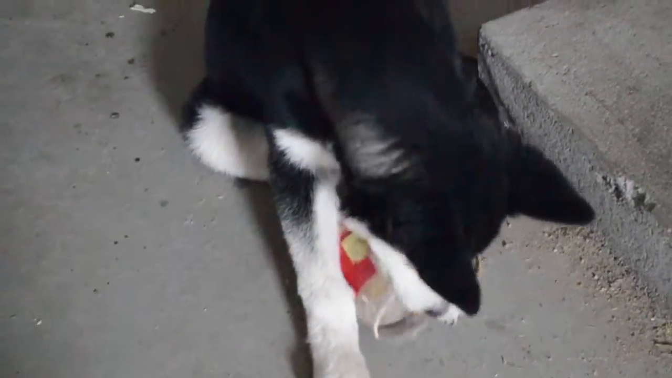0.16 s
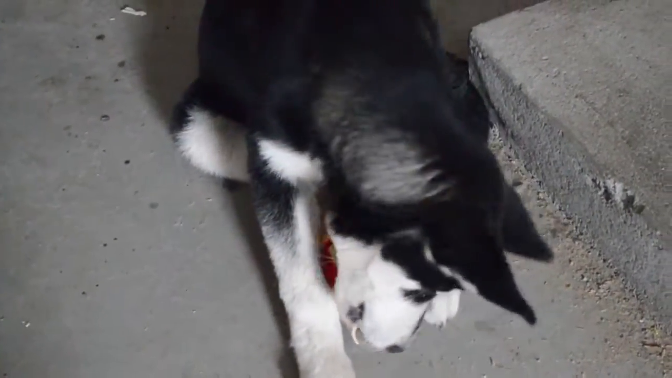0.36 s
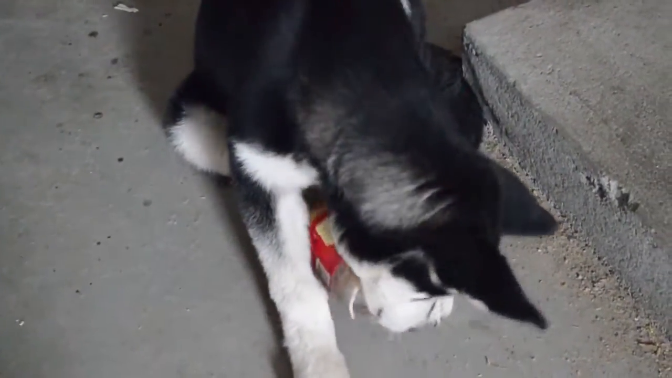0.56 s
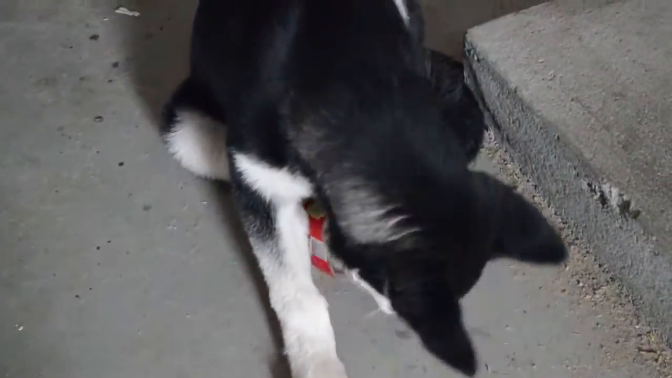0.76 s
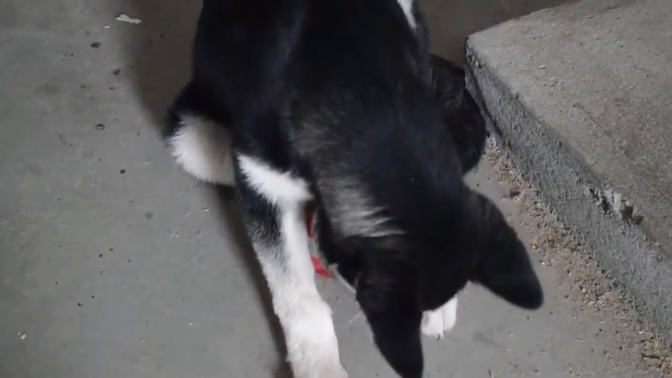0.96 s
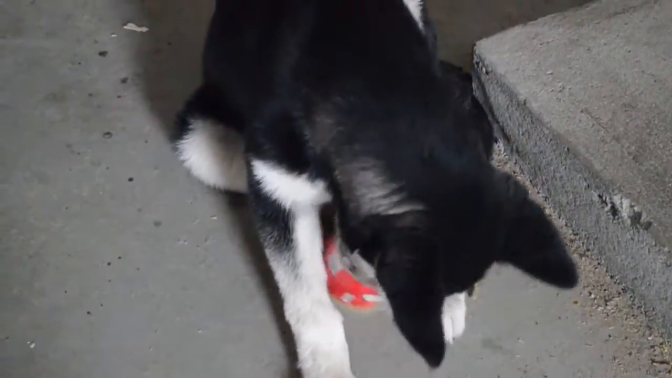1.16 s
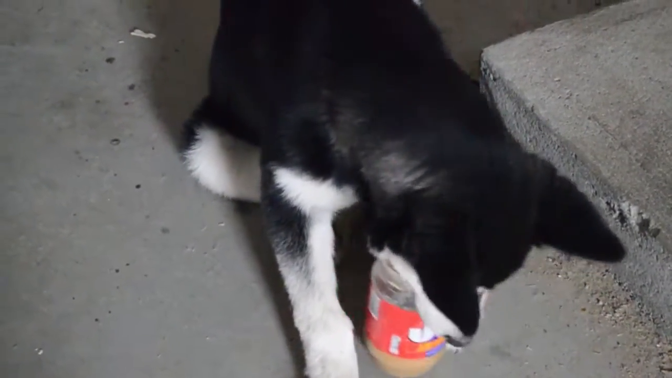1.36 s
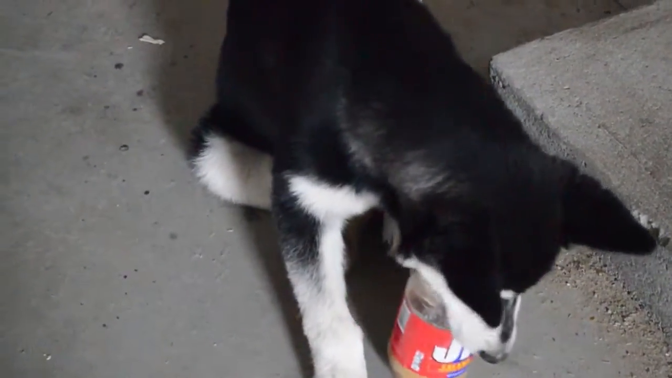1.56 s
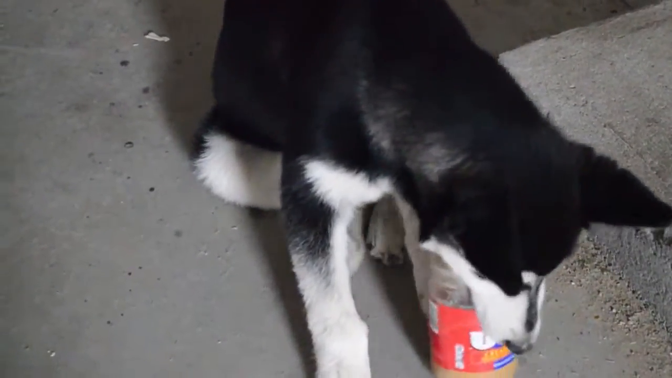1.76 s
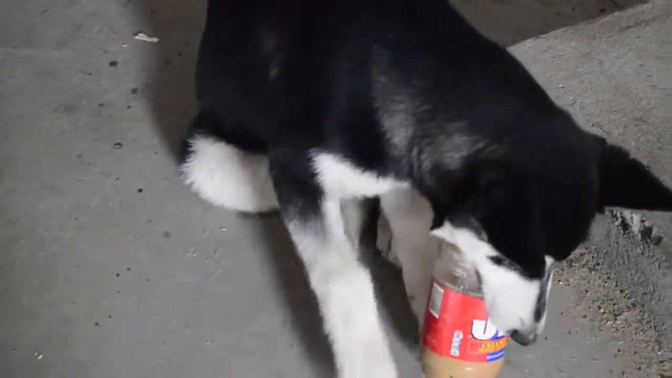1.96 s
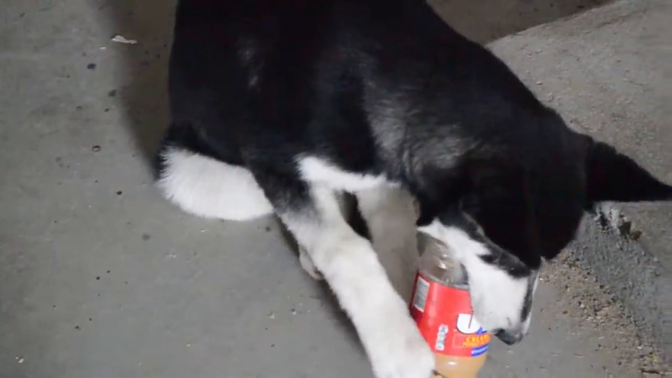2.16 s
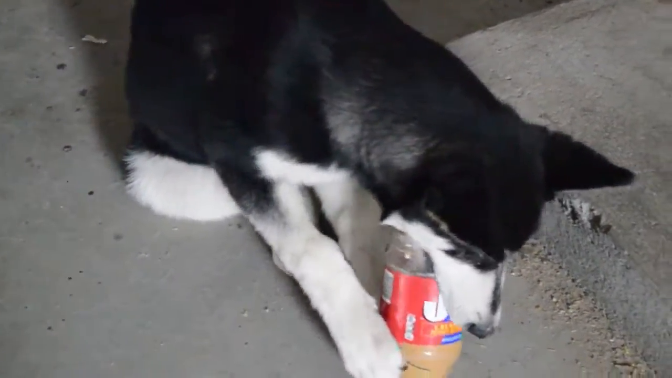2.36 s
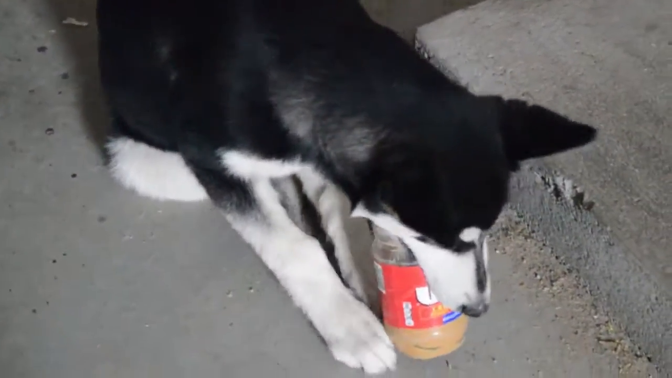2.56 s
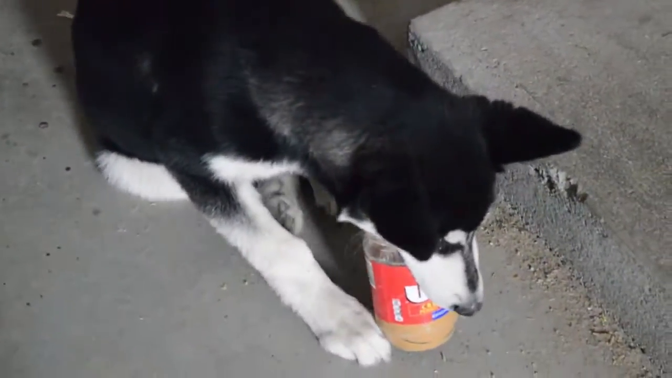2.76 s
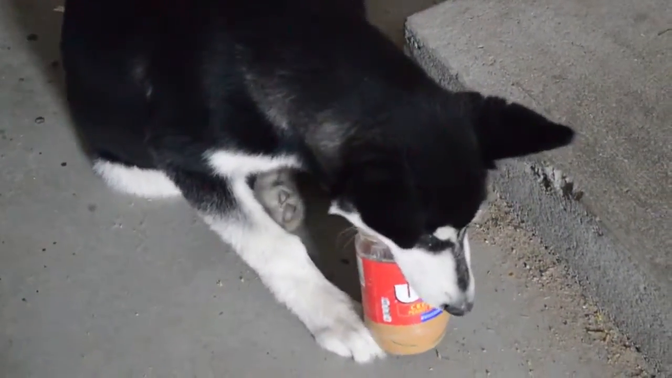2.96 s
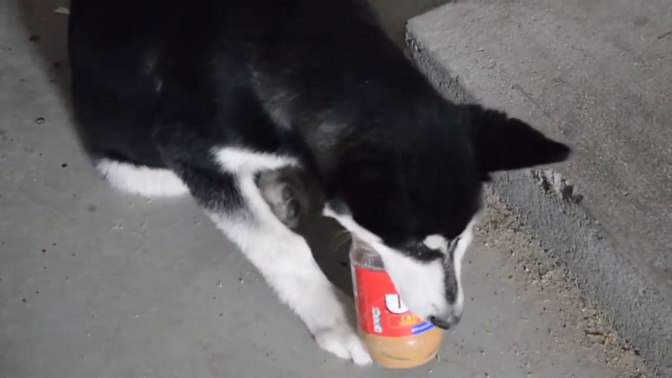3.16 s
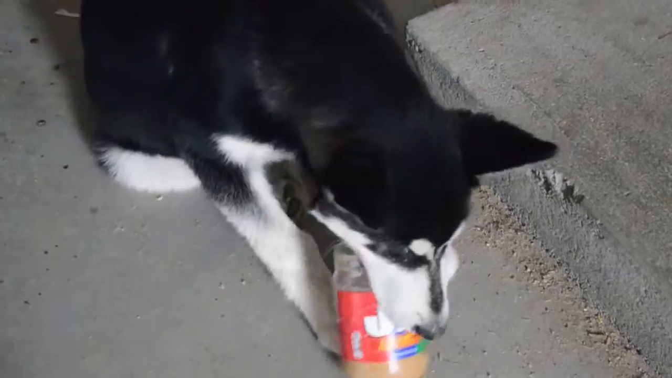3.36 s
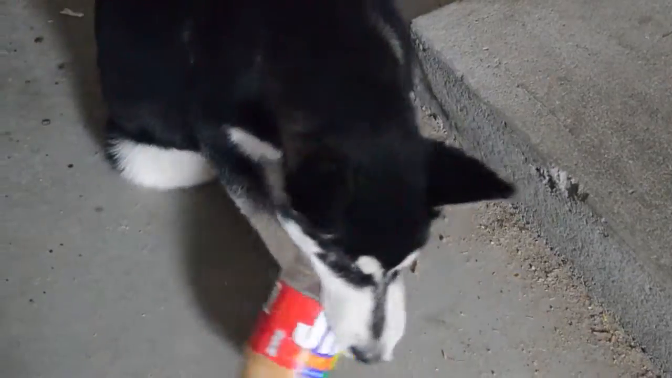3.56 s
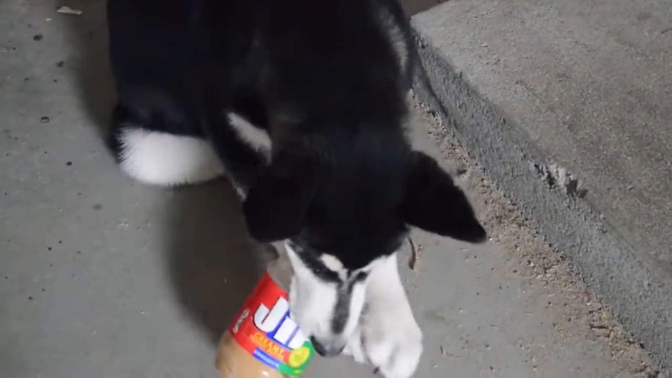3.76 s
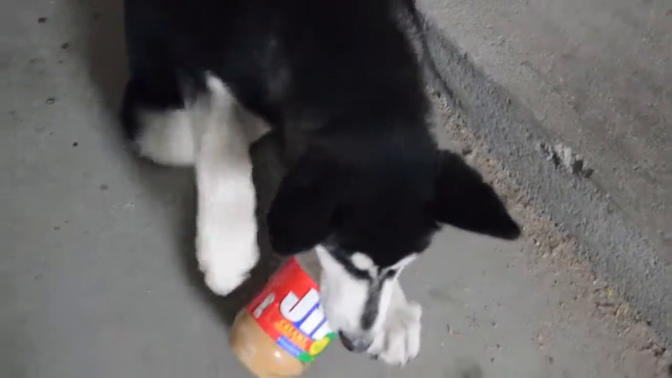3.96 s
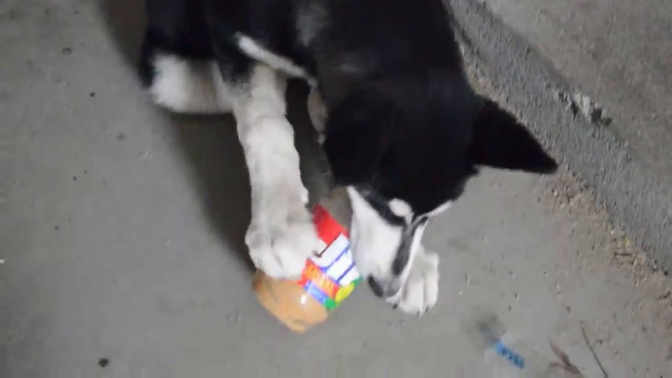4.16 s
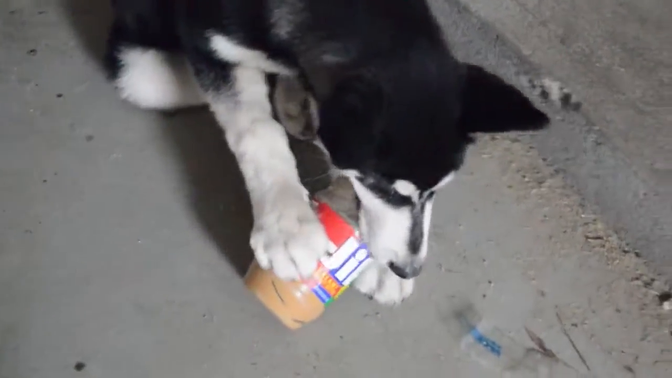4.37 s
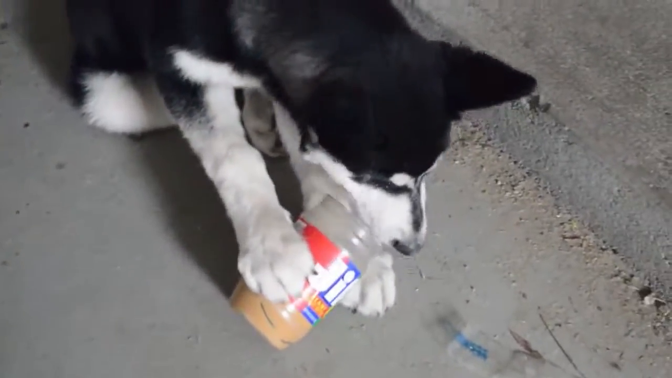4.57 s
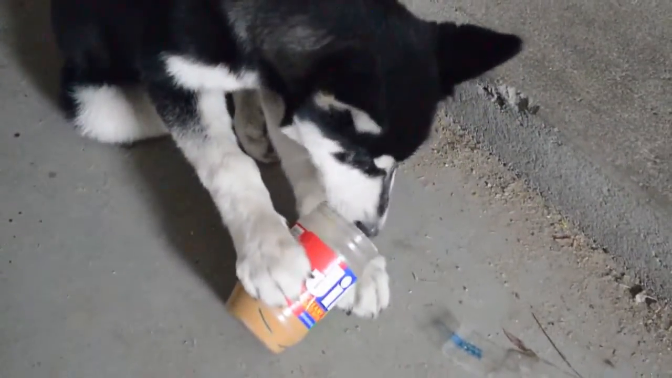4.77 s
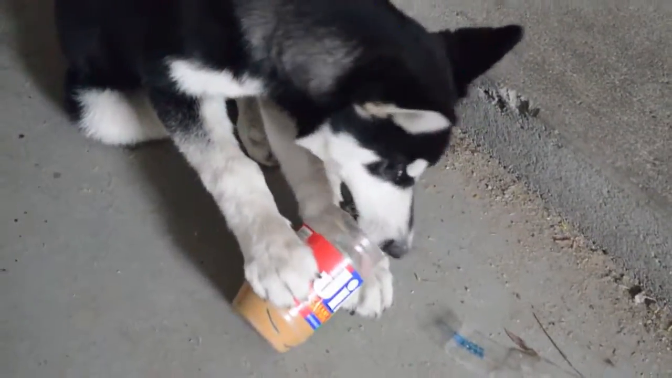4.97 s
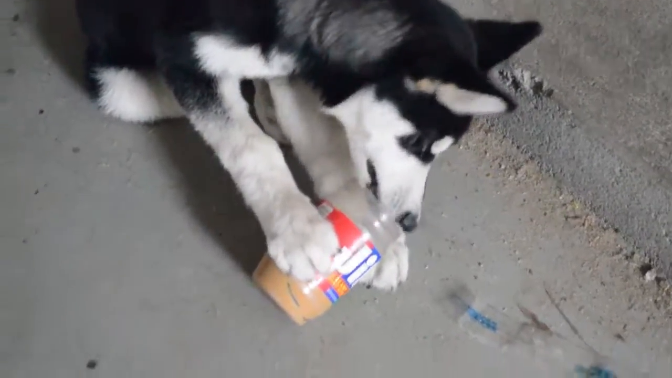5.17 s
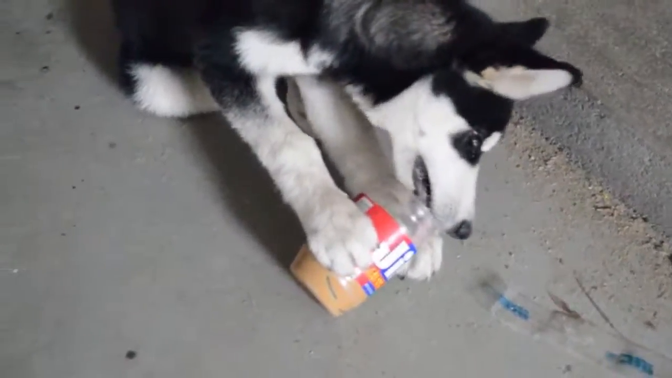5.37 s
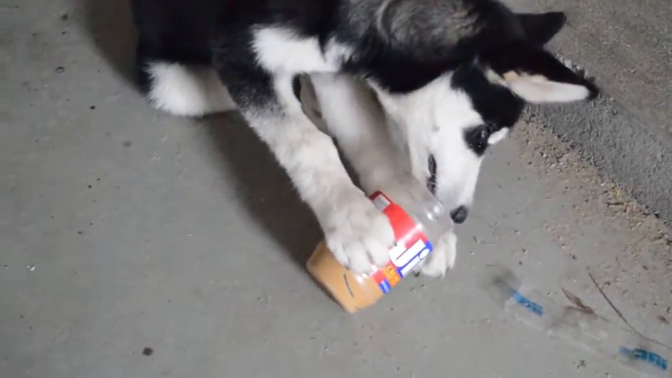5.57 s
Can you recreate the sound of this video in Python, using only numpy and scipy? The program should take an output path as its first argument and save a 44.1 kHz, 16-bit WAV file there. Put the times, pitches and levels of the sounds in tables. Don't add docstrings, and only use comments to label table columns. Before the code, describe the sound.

In a bare, echoing concrete garage a puppy works at an open plastic jar. Sharp knocks, hollow booms and gritty scrapes come in clusters, with wet tongue hiss and dry clicks between. The hardest clatter comes a little past the middle, then it calms to rasping and licking. A close, nearly mono handheld microphone also catches low room wash, a far engine and thin whine.

```python
import sys
import numpy as np
from scipy import signal
from scipy.fft import rfft, irfft, next_fast_len
from scipy.io import wavfile
from scipy.ndimage import uniform_filter1d

SR = 44100
rng = np.random.default_rng(int(sys.argv[2]) if len(sys.argv) > 2 else 0)


def unload_audio(sound):
    columns = np.transpose(np.atleast_2d(sound))
    steps = np.round(np.clip(columns, -1, 1) * 32767)
    wavfile.write(sys.argv[1], SR, steps.astype(np.int16))


def magnitude_from_level(level_db):
    exponent = np.asarray(level_db, float) / 20
    return 10 ** exponent


N = 247821


def evened(x):
    return x / np.sqrt(np.mean(x ** 2) + 1e-20)


def peaked(x):
    return x / abs(x).max()


def read(points, hz):
    f, value = np.transpose(points)
    return np.interp(np.log(hz + 1), np.log(f + 1), value)


def add(mix, s, sound):
    part = mix[round(s * SR):][:len(sound)]
    part += sound[:len(part)]


def bandpass(x, low_hz, high_hz):
    return signal.sosfilt(signal.butter(3, [low_hz, high_hz], "band", fs=SR, output="sos"), x)


def coloured(x, points):
    size = next_fast_len(len(x))
    gain = magnitude_from_level(read(points, np.fft.rfftfreq(size, 1 / SR)))
    return evened(irfft(rfft(x, size) * gain, size)[:len(x)])


def resonate(x, hz, width_hz):
    turn = np.exp(2j * np.pi * np.cumsum(hz * np.ones(len(x))) / SR)
    r = np.exp(-np.pi * width_hz / SR)
    return 2 * (turn * signal.lfilter([1 - r], [1, -r], x / turn)).real


def wobble(s):
    once = uniform_filter1d(rng.standard_normal(N), int(s * SR))
    return evened(uniform_filter1d(once, int(s * SR)))


def grit(per_s, spread_db):
    size = magnitude_from_level(spread_db * np.minimum(rng.exponential(1, N), 3))
    return evened(rng.standard_normal(N) * size * (rng.random(N) < per_s / SR))


# (frequency [Hz], level [dB per Hz])
WASH = [(12, -41), (20, -15), (59, 2.5), (342, -0.5), (382, 1.5), (549, -6.5), (857, -2), (1580, -8),
        (2540, -5.5), (4810, -13), (5380, -15.5), (6020, -13), (7730, -17.5), (14300, -27), (15500, -20.5)]
# (time [s], level [dB])
ENGINE = [(0.0, -75), (0.48, -75), (0.78, -66), (0.94, -60), (1.4, -63), (1.7, -60.5), (2.2, -56),
          (2.45, -58), (2.7, -65), (2.95, -70), (3.7, -72), (3.96, -62), (4.2, -67), (4.35, -58),
          (4.52, -68), (4.65, -60), (4.9, -67), (5.56, -65)]
# (time [s], level [dB])
HUM = [
    (4.45, -63),
    (4.576, -65),
    (4.764, -57),
    (4.91, -60),
    (5.09, -59),
    (5.182, -75),
    (5.25, -56),
]
WASH_DB = -51
ENGINE_HZ, ENGINE_WAVER_HZ, HUM_HZ = 64.5, 3, 173.4
TRILL_HZ, TRILL_DB = 5350, -61.5
WHINE_HZ, WHINE_DB = 15666, -65


def background():
    t = np.arange(N) / SR
    wash = magnitude_from_level(WASH_DB) * coloured(rng.standard_normal(N), WASH)
    engine_hz = ENGINE_HZ + ENGINE_WAVER_HZ * wobble(0.06)
    engine_level = magnitude_from_level(np.interp(t, *np.transpose(ENGINE)))
    engine = engine_level * np.sqrt(2) * np.sin(2 * np.pi * np.cumsum(engine_hz) / SR)
    throb_db = 2 * wobble(0.03)
    fuzz = resonate(resonate(rng.standard_normal(N), TRILL_HZ, 260), TRILL_HZ, 260)
    trill = magnitude_from_level(TRILL_DB + throb_db) * evened(fuzz)
    whine = magnitude_from_level(WHINE_DB) * np.sqrt(2) * np.sin(2 * np.pi * WHINE_HZ * t)
    hum_level = magnitude_from_level(np.interp(t, *np.transpose(HUM), -99, -99))
    hum = hum_level * evened(resonate(rng.standard_normal(N), HUM_HZ, 5.4))
    return wash + engine + hum + trill + whine


# (frequency [Hz], t60 [s])
GARAGE = [(200, 0.39), (500, 0.51), (1400, 0.66), (3700, 0.7), (9000, 0.46), (15000, 0.57)]
ECHO_S = 0.043


def garage(x):
    taps, at = np.zeros(SR), np.arange(220, SR - 20, 20)
    taps[at + rng.integers(0, 20, len(at))] = rng.choice([-1., 1.], len(at))
    s = np.arange(SR) / SR
    taps *= magnitude_from_level(4.2 * np.cos(2 * np.pi * s / ECHO_S) * np.exp(-s / 0.043))
    hz, t, z = signal.stft(taps, SR, nperseg=256)
    decay = magnitude_from_level(-60 * t / read(GARAGE, hz)[:, None])
    tail = signal.istft(z * decay, SR, nperseg=256)[1]
    return signal.fftconvolve(x, tail / np.linalg.norm(tail))[:N]


# (time [s], peak [dB], pitch [Hz])
LOW_THUDS = [(0.964, -46, 114), (1.474, -42, 158), (1.919, -44, 134), (2.057, -54, 75), (2.277, -48, 92),
             (3.326, -35.5, 145), (3.609, -49, 158), (4.09, -46, 133), (4.966, -45, 121), (5.045, -50, 127),
             (5.236, -54, 110), (5.5, -52, 72.5)]


def low_thuds():
    t, out = np.arange(4000) / SR, np.zeros(N)
    for s, db, hz in LOW_THUDS:
        push = np.sin(2 * np.pi * hz * t) * t * magnitude_from_level(-60 * t / 0.068)
        add(out, s, magnitude_from_level(db) * peaked(push))
    return out


# (time [s], peak [dB], air ring [Hz], room share [dB])
PUMPS = [(0.085, -41, 423, 0), (0.192, -22, 382, -5.5), (0.21, -23, 400, -1.5), (0.271, -34.5, 423.5, -1.5),
         (0.328, -32, 430, -2.5), (0.574, -43.5, 400, 11.5), (0.724, -27, 300, -1.5),
         (1.095, -25, 310, 1.5), (1.129, -21.5, 319, 0.5), (1.199, -29.5, 316, 9.5), (1.256, -28, 387, 4),
         (1.31, -39, 290.5, -9), (1.921, -31.5, 368, 2), (2.467, -25, 292, -10.5),
         (3.073, -31.5, 314, -2.5), (3.397, -28, 314, -2), (3.538, -21, 358, -10), (3.61, -7, 342, -7),
         (3.631, -11.5, 372, -8.5), (3.68, -12.5, 375.3, -3.5), (3.924, -32.5, 320, 2),
         (4.093, -23, 351, 1), (4.206, -39, 376, 0)]
# (time [s], peak [dB], air ring [Hz], room share [dB])
THUMPS = [(0.515, -40, 400, 1.5), (0.867, -32, 300, 0.5), (1.033, -35.5, 288, 6), (1.481, -24.5, 343, -3.5),
          (1.503, -28.5, 390, -32), (1.559, -29, 368, -25), (1.766, -21.5, 384, -5.5),
          (1.794, -28, 349, -0.5), (2.049, -37, 303, 7.5), (2.291, -29.5, 320, 3), (2.801, -38, 300, -1),
          (3.336, -23.5, 304, -1.5), (4.055, -24, 294, 2)]
PUMP_THUD_DB, THUMP_THUD_DB = -18, -9
THUD_HZ = 245


def booms():
    t, out = np.arange(4000) / SR, np.zeros((2, N))
    rise = 1 - np.exp(-t / 0.0049)
    thud = peaked(np.sin(2 * np.pi * THUD_HZ * t) * rise * magnitude_from_level(-60 * t / 0.07))
    events = [(*row, PUMP_THUD_DB) for row in PUMPS] + [(*row, THUMP_THUD_DB) for row in THUMPS]
    for s, db, hz, wet_db, thud_db in events:
        air = peaked(np.sin(2 * np.pi * hz * t) * rise * magnitude_from_level(-60 * t / 0.04))
        sound = magnitude_from_level(db) * (air + magnitude_from_level(thud_db) * thud)
        add(out[0], s, sound)
        add(out[1], s, magnitude_from_level(wet_db) * sound)
    return out


def strokes(rows, column, rise_db_per_s, fall_db_per_s):
    t = np.arange(0, N + 64, 64) / SR
    power = 0
    for row in rows:
        rise_db = rise_db_per_s * np.maximum(row[0] - t, 0)
        fall_db = fall_db_per_s * np.maximum(t - row[0] - row[1], 0)
        power = power + magnitude_from_level(2 * (row[column] - rise_db - fall_db))
    return np.interp(np.arange(N) / SR, t, 10 * np.log10(power))


# (frequency [Hz], width [Hz], level [dB])
RINGS = [(590, 45, -4), (850, 50, 33), (1010, 70, 19), (1394, 34, 1.5), (1534, 60, 3), (1770, 50, 2),
         (1864, 24, 0), (2150, 88, 7.5), (2400, 80, 0), (2620, 140, 7), (2770, 20, -4.5), (2965, 61, -32.5),
         (4230, 230, -4)]
REACH_OCTAVES = 0.4


def rings(x, near_hz):
    out = 0
    for hz, width_hz, db in RINGS:
        reach_db = -6.3 * (np.log2(near_hz / hz) / REACH_OCTAVES) ** 2
        out = out + magnitude_from_level(db + reach_db) * resonate(x, hz, width_hz) / np.sqrt(width_hz)
    return out


# (full force [s], hold [s], wall rasp [dB], jar air rumble [dB], base rattle [dB])
DRAGS = [(0.24, 0.033, -46.5, -41, -48), (0.52, 0.04, -48, -52, -60), (0.58, .03, -43, -57, -64),
         (0.65, 0.025, -45.5, -53, -50.5), (0.8, 0.14, -50.5, -47, -52), (1.04, .03, -51.5, -47, -48),
         (1.1, 0.03, -39.5, -34, -39.5), (1.15, .01, -44, -33, -44), (1.225, .005, -42, -30, -42.5),
         (1.285, 0.018, -39.5, -37, -40.5), (1.38, 0.22, -46.5, -43.5, -46.5), (1.8, 0.07, -49, -53, -43),
         (1.93, 0.093, -46.5, -38.5, -58), (2.1, 0.63, -49, -54.5, -52), (2.47, 0.012, -33, -36, -38.5),
         (2.64, 0.038, -48, -67, -67), (2.85, 0.16, -47, -56, -60), (3.05, 0.14, -53.5, -50, -56.5),
         (3.345, 0.022, -45, -37.5, -58), (3.41, 0.02, -40, -35, -54), (3.45, .02, -37, -38, -60),
         (3.49, 0.017, -35, -32, -62), (3.55, .02, -40, -44, -51), (3.62, 0.048, -43, -30.5, -48),
         (3.74, 0.19, -48.5, -42.5, -59), (4.125, 0.036, -38.5, -38.5, -43.5), (4.2, 0.057, -39, -46, -55),
         (4.4, 0.19, -48, -60, -57), (4.66, 0.23, -47, -72, -55.5), (4.96, 0.1, -49.5, -57.5, -61),
         (5.24, 0.12, -43.5, -60, -57), (5.35, 0.21, -44, -57.5, -53)]
# (full force [s], hold [s], hiss [dB])
LICKS = [(0.105, .02, -53), (0.258, .02, -49.5), (0.456, .04, -55), (0.553, 0.07, -41),
         (0.734, 0.034, -41.5), (0.834, 0.043, -41.5), (1.1, 0.057, -40), (1.17, .01, -48),
         (1.215, 0.02, -37.5), (1.27, 0.015, -41.5), (1.418, 0.17, -56), (1.797, 0.035, -52),
         (1.94, 0.19, -49.5), (2.262, 0.08, -50), (2.46, 0.04, -40), (2.668, 0.24, -55.5),
         (2.96, 0.21, -57.5), (3.39, 0.036, -41), (3.493, 0.034, -34.5), (3.54, 0.023, -38),
         (3.64, 0.054, -42.5), (3.814, 0.041, -41.5), (4.13, .03, -44), (4.2, 0.044, -48),
         (4.52, 0.045, -48), (4.67, 0.2, -45.5), (4.923, 0.076, -51), (5.199, .06, -49), (5.32, .15, -47.5),
         (5.53, 0.063, -49)]
# (time [s], ring [Hz])
FLEX = [(0.27, 2260), (0.6, 2620), (1.019, 2190), (1.39, 2460), (1.7, 1940), (1.91, 1930), (2.16, 2420),
        (2.4, 1800), (2.57, 1730), (3.2, 2270), (4.77, 2300), (5.01, 2600), (5.3, 2300)]
# (frequency [Hz], level [dB per Hz])
RASP = [(650, -42), (1100, 0), (1530, 0), (2200, 0), (2300, 1.5), (3280, -5.5), (4070, -7), (4970, -14),
        (6500, -30), (8450, -51), (14300, -120)]
# (frequency [Hz], level [dB per Hz])
HISS = [(2820, -5), (4800, -9), (5640, -5), (7840, 1), (9040, -3), (11500, -9.5), (14800, -27),
        (15500, -40)]
DRAG_RISE_DB_PER_S, DRAG_FALL_DB_PER_S = 214, 102
LICK_RISE_DB_PER_S, LICK_FALL_DB_PER_S = 222, 137
RUB_RING_DB = -10


def rubbing():
    rasp_db, air_db, base_db = (strokes(DRAGS, k, DRAG_RISE_DB_PER_S, DRAG_FALL_DB_PER_S)
                                for k in range(2, 5))
    hiss_db = strokes(LICKS, 2, LICK_RISE_DB_PER_S, LICK_FALL_DB_PER_S)
    force = np.clip((air_db + 62) / 22, 0.1, 1)
    grains = grit(4000, 0.99) + 0.78 * force * grit(400, 0.87)
    grains = grains * magnitude_from_level(2.0 * force * wobble(0.017))

    flex_hz = np.interp(np.arange(N) / SR, *np.transpose(FLEX))
    rasp = coloured(grains, RASP)
    rasp = rasp + magnitude_from_level(-18) * evened(resonate(grains, flex_hz, 580))
    rasp = rasp + magnitude_from_level(RUB_RING_DB) * evened(rings(grains, flex_hz))

    base = resonate(resonate(grains, 566, 180), 685, 260)
    base = base + magnitude_from_level(6.5) * resonate(resonate(grains, 664, 300), 1010, 290)
    base_ring = resonate(grains, 587, 40) + resonate(grains, 815, 56)
    base = evened(base) + magnitude_from_level(-14) * evened(base_ring)

    flicker_db = 3 * force * wobble(0.005)
    hiss = coloured(grit(5000, 0.32), HISS) * magnitude_from_level(hiss_db + flicker_db)

    slips = grit(1500, 1.7)
    air = resonate(resonate(slips, 304, 62), 253, 182)
    air = air + magnitude_from_level(6.0) * resonate(resonate(slips, 335.3, 25.0), 367.3, 32)
    return evened(rasp) * magnitude_from_level(rasp_db) + hiss + evened(air) * magnitude_from_level(air_db) + evened(base) * magnitude_from_level(base_db)


# (frequency [Hz], width [Hz], level [dB])
WALL = [(1065, 840, -11), (1910, 910, -9), (2550, 220, -7.5), (3950, 750, -3.5)]
KNOCK_RING_DB = -8
HARDNESS = 0.13


def knock(contact, scuff, force_db, hz, tick_db, base_db):
    wall = sum(magnitude_from_level(db) * resonate(contact, f, width_hz) for f, width_hz, db in WALL)
    wall = wall + magnitude_from_level(-4.5) * resonate(contact, hz, 210)
    edge_hz = 1.474 * hz * magnitude_from_level(HARDNESS * np.clip(force_db + 33, 0, 25))
    wall = bandpass(wall, 700, edge_hz)
    base = resonate(resonate(contact, 868, 255), 974, 630)
    tick = resonate(resonate(scuff, 6650, 2600), 9600, 3200)
    out = peaked(wall) + magnitude_from_level(KNOCK_RING_DB) * peaked(rings(contact, hz))
    return out + magnitude_from_level(base_db) * peaked(base) + magnitude_from_level(tick_db) * peaked(tick)


# (delay [s], level [dB])
FLOOR_BOUNCES = [(.0016, -8), (.0036, -7), (.0062, -13.5)]


def bounced(x):
    out = x.copy()
    for s, db in FLOOR_BOUNCES:
        add(out, s, magnitude_from_level(db) * x)
    return out


# (time [s], peak [dB], ring [Hz], room share [dB], tick relative [dB])
BITES = [(0.1035, -30.5, 3570, -7, -11), (0.1887, -20, 2300, -5.5, -3), (0.449, -33, 2780, -12, 0),
         (0.5067, -25.5, 2530, -0.5, -3.5), (0.5264, -19, 2850, -9.5, -4), (0.572, -24.5, 3770, -5, -12),
         (0.5906, -25, 2650, -1, -15), (0.597, -25, 3900, -2, -12), (0.616, -29, 2630, -8, -15),
         (0.648, -31, 2650, -3, -15), (1.0192, -37, 2150, -9, -9), (1.145, -20.5, 2100, 2, -15),
         (1.1548, -22, 2060, 2, -3), (1.1598, -28, 3800, -20, 1), (1.199, -13, 2100, -4, -9),
         (1.22, -34, 2030, -1, -1), (1.2527, -13.5, 2500, -11, -11), (1.289, -35, 2440, -8, -12),
         (1.9264, -25.5, 1860, -27, -1), (1.974, -30.5, 2300, -5, -15), (2.0595, -23, 2800, 0, -6),
         (2.2736, -20, 3300, -5.5, -6), (2.4474, -27.5, 1740, 9, -3.5), (2.8428, -29.5, 2100, -1, -5.5),
         (2.8994, -32, 1920, -6, -5), (3.073, -25.5, 2410, -6, -7), (3.292, -44, 2430, 4.5, -9),
         (3.3977, -21, 1990, 1, -10), (3.4383, -20, 2400, -1, -16), (3.4947, -19, 1610, -11, -12),
         (3.5412, -9.5, 2680, -10, 0), (4.0491, -6.5, 2330, -8.5, -9), (4.0586, -10, 1820, -2.5, -3.5),
         (4.0917, -7, 3200, -9.5, -21), (4.1021, -23, 2200, -3, -2), (4.111, -26, 2300, -9, -14)]
# (time [s], peak [dB], ring [Hz], room share [dB])
NUDGES = [(0.086, -39, 2100, -10), (0.564, -26, 2550, 5), (1.0504, -36.5, 1920, 6.5),
          (1.14, -41, 2130, -11), (1.723, -37, 2060, -5), (1.7673, -13.5, 1600, -4.5),
          (2.0837, -27.5, 2640, -13), (3.0626, -35.5, 1960, 2.5), (3.3605, -25.5, 1960, 5.5),
          (4.0093, -32.5, 2560, -30), (4.954, -26, 2500, -19)]
# (time [s], peak [dB], ring [Hz], room share [dB], grit tick relative [dB])
LANDINGS = [(0.2099, -20, 1600, -13, -1), (1.0965, -22.5, 2550, -5, -23), (1.11, -16, 2150, -9, -12),
            (1.12, -21, 2040, -15, -14), (1.3094, -28, 2340, -18, -11), (1.479, -21.5, 1330, -8, -17),
            (2.3166, -18, 3200, -8.5, -10), (2.4199, -41, 2440, -10, -16), (2.462, -13.5, 1700, -20, -20),
            (2.4665, -18, 1720, -11, -14), (2.472, -30, 1800, -17, -18), (2.795, -28.5, 1900, -7.5, -33),
            (3.259, -32, 2550, -3.5, -11), (3.3353, -21, 2550, -4, -12), (3.3674, -19, 1520, -1, 7),
            (3.4808, -17.5, 1500, -3, -12), (3.613, -18.5, 2060, -0.5, -3), (4.534, -27, 2350, -9, 6)]
BITE_TICK_DB, BITE_BASE_DB = 3, -20.5
NUDGE_TICK_DB, NUDGE_BASE_DB = -11.5, -44
LANDING_BASE_DB = -8.5


def contacts():
    bites = [(s, db, hz, BITE_TICK_DB + tick_db, BITE_BASE_DB, wet_db)
             for s, db, hz, wet_db, tick_db in BITES]
    nudges = [(s, db, hz, NUDGE_TICK_DB, NUDGE_BASE_DB, wet_db) for s, db, hz, wet_db in NUDGES]
    landings = [(s, db, hz, tick_db, LANDING_BASE_DB, wet_db)
                for s, db, hz, wet_db, tick_db in LANDINGS]
    return sorted(bites + nudges + landings)


# (time [s], peak [dB], pitch [Hz], room share [dB])
CLICKS = [(0.62, -33, 8300, -16), (0.7252, -24, 9200, -17), (0.734, -33, 11500, -11),
          (0.747, -34, 8820, -1), (0.765, -24.5, 9050, -9.5), (0.834, -19, 6900, -14),
          (0.873, -27, 8100, -26), (1.0756, -24, 6460, -0.5), (1.112, -24, 6950, -10),
          (1.1215, -34, 7140, -15), (1.2315, -24, 7640, -3), (1.543, -33, 7800, -14),
          (1.683, -39.5, 9400, 1), (1.935, -39, 9300, -18), (2.0644, -22.5, 7300, -12.5),
          (2.3775, -27, 10100, -6), (3.4082, -18, 9000, -2), (3.631, -17.5, 6600, -25),
          (3.8428, -42, 7560, -13), (3.967, -42, 7740, -15), (4.048, -20, 12800, -32),
          (4.0593, -22, 13200, -25), (4.315, -40, 7800, -18), (4.334, -29, 7500, -10),
          (4.5131, -28, 7930, -13), (4.558, -28, 7500, -15), (4.6441, -21, 7900, -17),
          (4.8062, -35.5, 7800, -2)]


def knocks():
    t, out = np.arange(2400) / SR, np.zeros((2, N))
    blow = 1. * (t == 0)
    dying = magnitude_from_level(-60 * t / 0.018)
    soft = t * magnitude_from_level(-60 * t / 0.005)
    for s, db, *colour, wet_db in contacts():
        chance = rng.standard_normal(len(t))
        direct = knock(blow + 0.52 * chance * dying, chance * soft, db, *colour)
        add(out[0], s, magnitude_from_level(db) * peaked(bounced(direct)))
        add(out[1], s, magnitude_from_level(db + wet_db) * knock(blow, blow, db, *colour))
    for s, db, hz, wet_db in CLICKS:
        chance = rng.standard_normal(len(t))
        click = magnitude_from_level(db) * peaked(resonate(resonate(chance * soft, hz, 1150), hz, 5300))
        add(out[0], s, click)
        add(out[1], s, magnitude_from_level(wet_db) * click)
    return out


def scene():
    hit, boom, rub = knocks(), booms(), rubbing()
    wet = garage(magnitude_from_level(8.0) * hit[1] + magnitude_from_level(3.0) * boom[1] + magnitude_from_level(-10.5) * rub)
    jar = bandpass(hit[0] + boom[0] + rub + wet, 175, 12500)
    return np.tile(jar + low_thuds() + background(), (2, 1))


STARVE_DB, DEAF_DB = -36.5, -27


def starved(x):
    treble = signal.sosfilt(signal.butter(2, 1500, "high", fs=SR, output="sos"), x[0])
    power = abs(uniform_filter1d(treble ** 2, size=1400, origin=699))
    level_db = 10 * np.log10(power + 1e-12)
    out = x
    for limit_db, edges_hz in ((STARVE_DB, [14250, 15480]), (DEAF_DB, [15480, 16200])):
        shut = uniform_filter1d(1. * (level_db > limit_db), size=300)
        band = signal.firwin(601, edges_hz, pass_zero=False, window=("kaiser", 6), fs=SR)
        out = out - shut * signal.oaconvolve(x, band[None], "same")
    return out


# (frequency [Hz], level [dB])
SIDE = [(3800, -95), (4600, 2.5), (6000, -8.5), (7500, -18.5), (9000, -12), (10500, -5), (13000, -3.5),
        (15500, -5)]
# (frequency [Hz], share [0-1])
MERGED = [(4500, 0.92), (6000, 0.4), (7800, 0.21), (10000, .15), (13000, 0.3), (15000, 0.6)]


def widened(dry):
    hz, t, z = signal.stft(dry[0], SR, nperseg=256)
    scramble = np.exp(2j * np.pi * rng.random(z.shape[::-1]).T)
    z = z * magnitude_from_level(read(SIDE, hz))[:, None] * scramble
    patches = rng.random((len(t) // 24 + 1, len(hz) // 6 + 1)).repeat(24, 0).repeat(6, 1)
    z = z * (patches[:len(t), :len(hz)].T > read(MERGED, hz)[:, None])
    side = np.sqrt(2) * signal.istft(z, SR, nperseg=256)[1][:N]
    return dry + side * np.array([[1], [-1]])


def low_pass(x):
    return signal.sosfilt(signal.butter(12, 16780, fs=SR, output="sos"), x)


def record(dry):
    edge = signal.firwin(401, 15900, window=("kaiser", 9), fs=SR)
    limited = signal.oaconvolve(widened(dry), edge[None], "same")
    mix = starved(limited)
    return low_pass(mix)


dry = scene()
out = record(dry)
unload_audio(out)
```